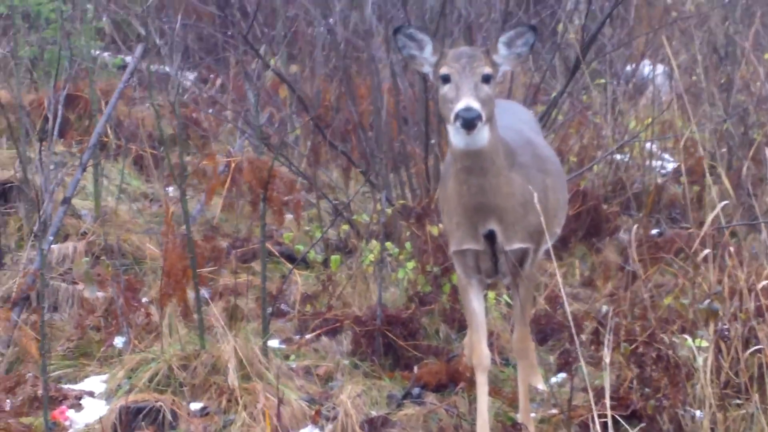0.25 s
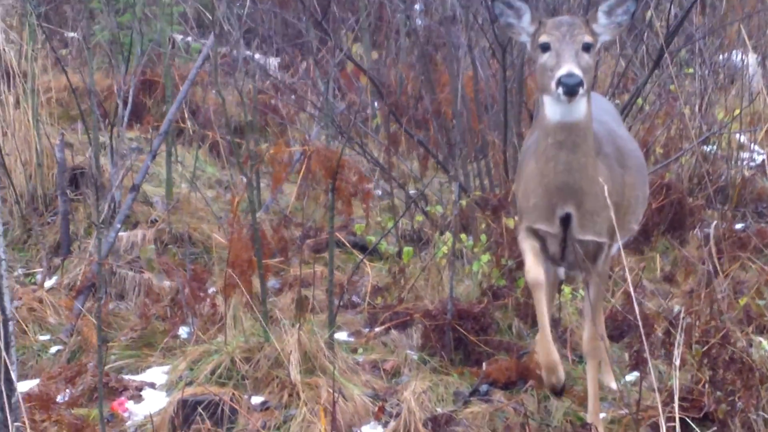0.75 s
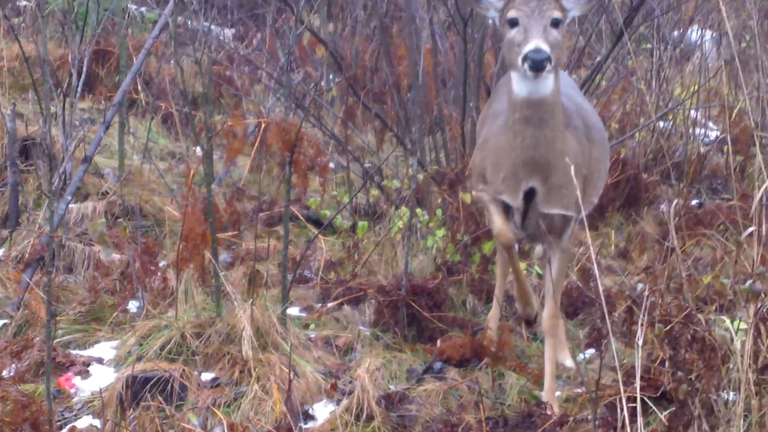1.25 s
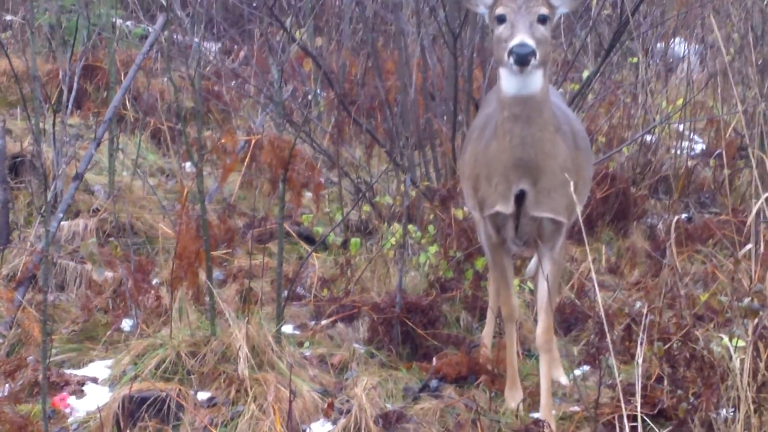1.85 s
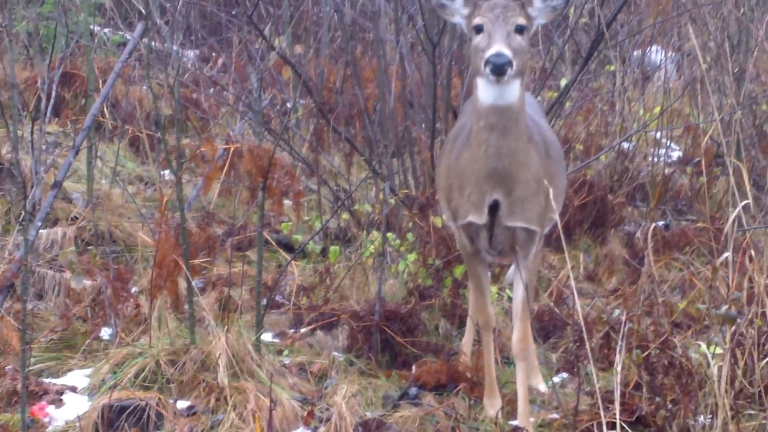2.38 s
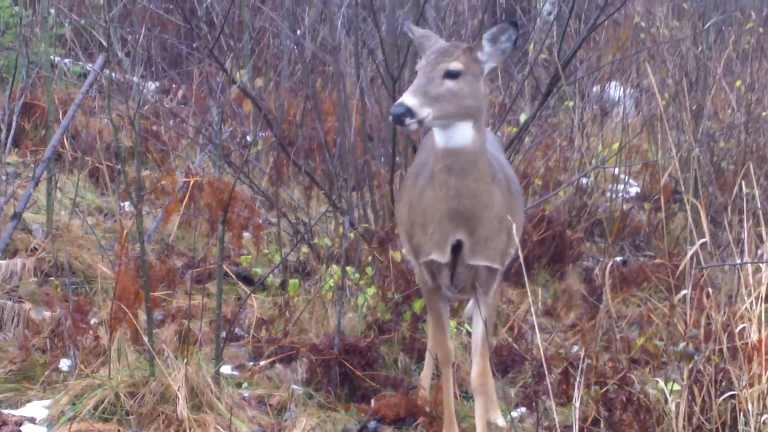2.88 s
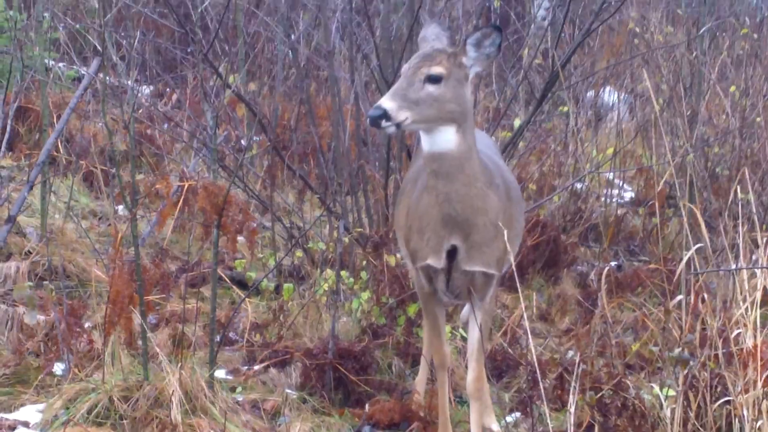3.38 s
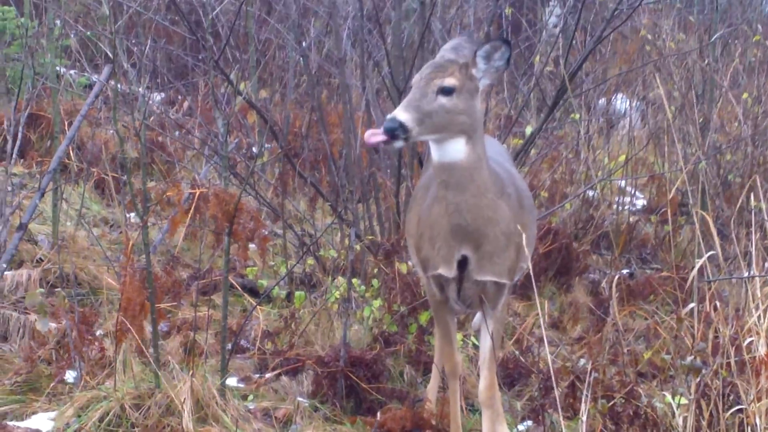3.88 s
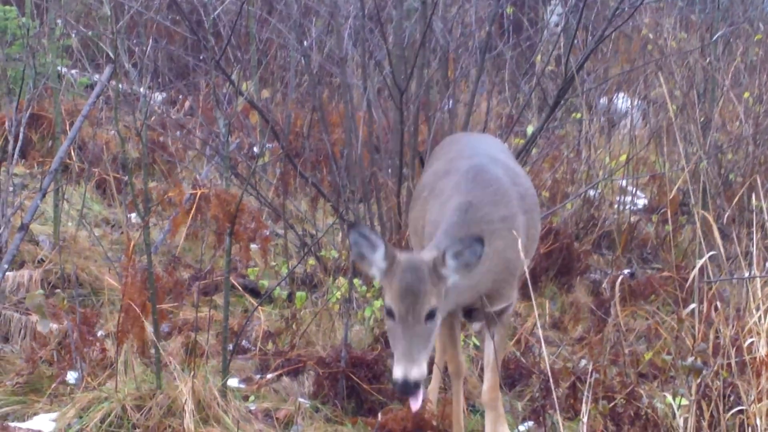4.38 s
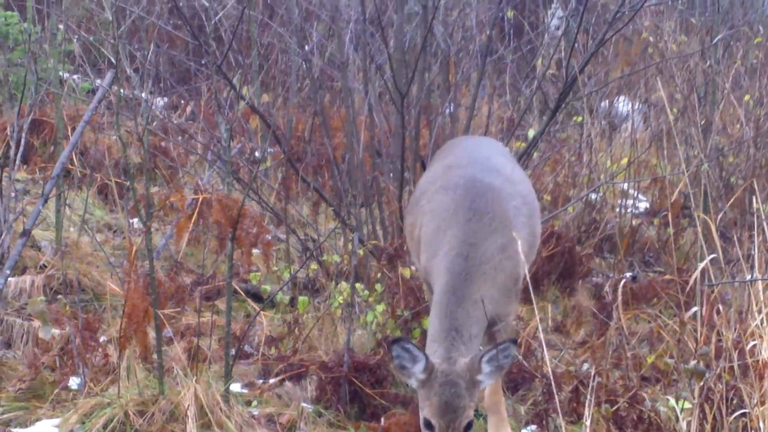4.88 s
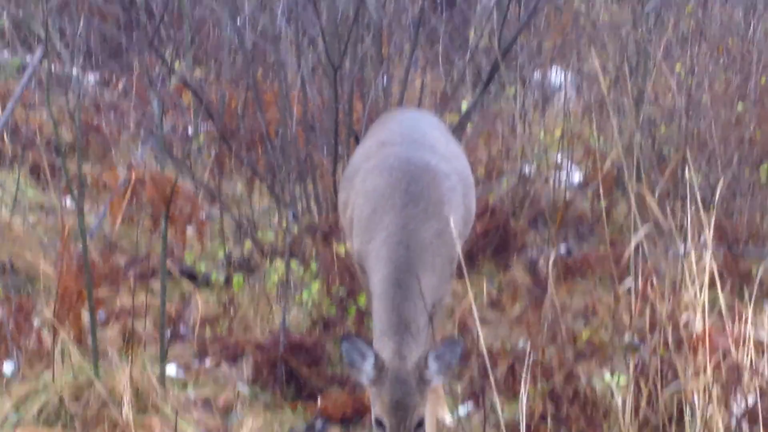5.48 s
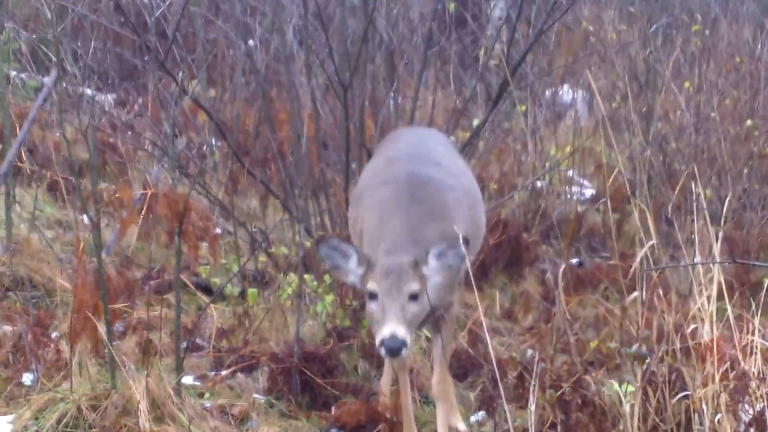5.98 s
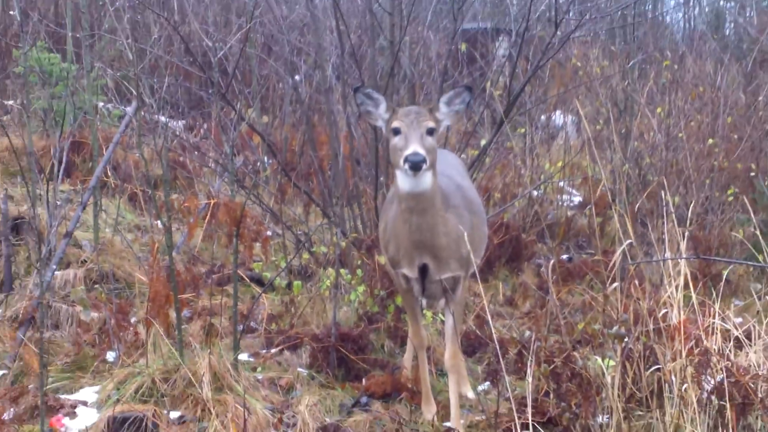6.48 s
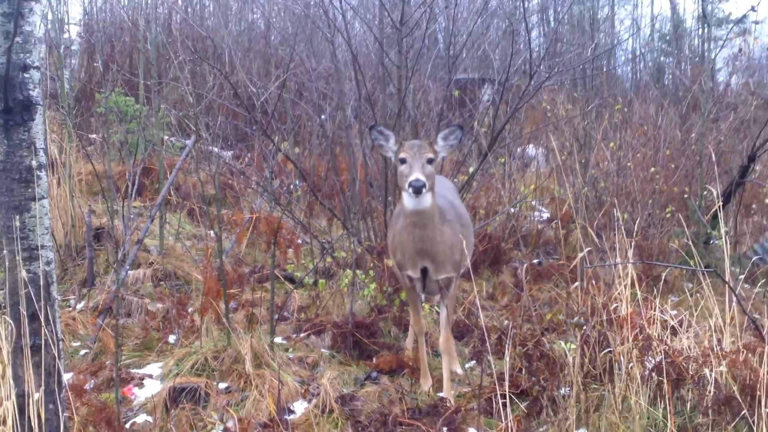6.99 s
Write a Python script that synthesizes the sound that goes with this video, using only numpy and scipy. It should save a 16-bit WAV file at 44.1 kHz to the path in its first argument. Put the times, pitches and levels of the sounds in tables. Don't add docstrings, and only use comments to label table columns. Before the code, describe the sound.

A close, rough wind recording: low puffs and blunt knocks on a small camera microphone, strongest around the third second. Grainy dry grass flickers in the gusts, stems scrape briefly close by, and bare brush gives a smooth distant wash. Crisp little handling clicks follow, then one violent wind slam briefly ducks the sound. It ends calmer, with rumble, faint hiss and a very thin motor whine; no animal sound.

```python
import sys
import numpy as np
from scipy import signal
from scipy.fft import rfft, irfft, next_fast_len
from scipy.io import wavfile
from scipy.ndimage import uniform_filter1d

SR = 44100
rng = np.random.default_rng(int(sys.argv[2]) if len(sys.argv) > 2 else 0)


def linear_from_db(decibels):
    return 10 ** (np.asarray(decibels, float) / 20)


def digitize_waveform(pressure):
    field = np.atleast_2d(pressure).T
    bounded = np.clip(field, -1, 1)
    quanta = np.round(bounded * 32767).astype(np.int16)
    wavfile.write(sys.argv[1], SR, quanta)


N = 319725
TIME_S = np.arange(N) / SR


def rms_one(x):
    return x / np.sqrt(np.mean(x ** 2) + 1e-20)


def in_time(rows):
    s, *columns = np.transpose(rows)
    return [np.interp(TIME_S, s, c) for c in columns]


def drift(rate_hz):
    r = np.exp(-80 * np.pi * rate_hz / SR)
    coarse = rng.standard_normal(N // 40 + 2002)
    slow = signal.lfilter([1], [1, -2 * r, r * r], coarse)[2000:]
    return np.interp(np.arange(N) / 40, np.arange(len(slow)), rms_one(slow))


def gains(spectrum, size):
    hz, level_db = np.transpose(spectrum)
    pitch = np.log(np.arange(size // 2 + 1) * SR / size + 1)
    return linear_from_db(np.interp(pitch, np.log(hz), level_db)), pitch


def colour(x, spectrum):
    size = next_fast_len(N, True)
    gain, _ = gains(spectrum, size)
    return rms_one(irfft(rfft(x, size) * gain, size)[:N])


def patchy(spectrum, shared_db, own_db, rate_hz, count):
    size = next_fast_len(N, True)
    gain, pitch = gains(spectrum, size)
    noise = rfft(rng.standard_normal(size)) * gain
    hz = np.transpose(spectrum)[0]
    centres = np.linspace(np.log(hz[1]), np.log(hz[-3]), count)
    out = np.zeros(N)
    for row in np.eye(count):
        band = irfft(noise * np.interp(pitch, centres, row), size)[:N]
        out += band * linear_from_db(shared_db + own_db * drift(rate_hz))
    return rms_one(out)


def evened(x, seconds):
    span = int(seconds * SR)
    level = np.sqrt(uniform_filter1d(uniform_filter1d(x ** 2, span), span) + 0.095)
    return rms_one(x / level ** 0.62)


def split(x, hz):
    low = signal.sosfiltfilt(signal.butter(3, hz, fs=SR, output="sos"), x)
    return rms_one(low), rms_one(x - low)


def ring(clicks, hz, t60_s):
    r, w = linear_from_db(-60 / (t60_s * SR)), 2 * np.pi * hz / SR
    return signal.lfilter([0, np.sin(w)], [1, -2 * r * np.cos(w), r * r], clicks + 1e-18)


# (time [s], peak rumble [dB], half length [s], thud re rumble [dB])
PUFFS = [(0.041, -27, 0.067, -20), (.28, -16, .035, -12), (.41, -16, 0.063, -9), (0.816, -21.5, 0.082, -19),
         (0.977, -15, 0.031, -5), (1.213, -25.5, 0.086, -14.5), (1.438, -19, 0.057, -8.5),
         (1.65, -19, .055, -1.5), (1.77, -24, 0.048, -17), (1.894, -21, 0.042, -8),
         (2.106, -27, 0.064, -10), (2.68, -25, .055, -24), (2.92, -22, 0.037, -2.5),
         (3.07, -23.5, 0.11, -12), (3.227, -15.5, .03, -14), (3.428, -22.5, .04, -25),
         (3.577, -18.5, 0.078, -11.5), (3.89, -20, 0.11, -3), (4.14, -24, 0.037, -18),
         (4.247, -24.5, .035, 0), (4.423, -22.5, 0.049, -11.5), (4.655, -27, 0.078, -4),
         (4.923, -22, 0.059, -9.5), (5.134, -27, 0.075, -18), (5.825, -23, .035, -24),
         (6.21, -23, .025, -9), (6.36, -25, .07, -25), (6.643, -27.5, 0.095, -32), (6.844, -22, 0.025, -26),
         (7.19, -23, .075, -2)]
# (time [s], rumble [dB], thud re rumble [dB])
STREAM = [(0, -37.5, -10), (.2, -40, -2), (.6, -33.5, -10), (1.35, -35, -8), (1.7, -32.5, -8),
          (2.3, -34, -13), (2.8, -35, -14), (3.3, -31.5, -12), (4.05, -28.5, -10), (4.8, -35, -14),
          (5.3, -33.5, -20), (5.7, -28.5, -17), (5.9, -34.5, -17), (6.04, -37, -10), (6.1, -31, -7),
          (6.5, -32, -20), (7.0, -30.5, -16), (7.25, -26, 0)]


def airflow():
    t = TIME_S[::32]
    stream, edge = linear_from_db(2 * np.array(in_time(STREAM))[:, ::32])
    s, top_db, half_s, sharp_db = np.transpose(PUFFS)[:, :, None]
    puffs = linear_from_db(2 * top_db) * np.exp(-2 * ((t - s) / half_s) ** 2)
    rumble_power = stream + puffs.sum(0)
    thud_power = stream * edge + (puffs * linear_from_db(2 * sharp_db)).sum(0)
    return [np.interp(TIME_S, t, np.sqrt(p)) for p in (rumble_power, thud_power)]


# (frequency [Hz], density [dB per Hz])
RUMBLE = [(8.8, -41), (15, 3), (40, 4), (90, -15), (120, -39), (200, -120)]
# (frequency [Hz], density [dB per Hz])
THUD = [(35, -28), (60, 0), (94, -1.5), (163, -18), (226, -27.5), (260, -32.5), (360, -54.5), (420, -42.5),
        (550, -72), (920, -120)]


def turbulence():
    rumble_amp, thud_amp = airflow()
    lumps = drift(15.4)
    rumble = evened(patchy(RUMBLE, 0.59 * lumps, own_db=0.0, rate_hz=6.7, count=3), seconds=0.064)
    thud = evened(patchy(THUD, 5.3 * lumps, own_db=2.0, rate_hz=28, count=4), seconds=0.083)
    return linear_from_db(-1.43) * rumble_amp * rumble + linear_from_db(-3.0) * thud_amp * thud


def eddy(s, peak_db, width_ms, sign=1):
    out = np.zeros(N)
    near = np.arange(round((s - .08) * SR), min(round((s + .08) * SR), N))
    turn = (near / SR - s) / (width_ms / 1000)
    out[near] = -sign * linear_from_db(peak_db) * turn * np.exp((1 - turn ** 2) / 2)
    return out


# (time [s], peak [dB], width [ms])
EDDIES = [(0.245, -32, 2.8), (0.349, -35, 3.9), (0.41, -24, 3.2), (0.963, -19, 4.1), (0.99, -26, 3),
          (1.405, -26, 4.4), (1.595, -16, 2.8), (1.669, -16, 2.95), (1.897, -26, 3.3), (2.907, -34, 4.8),
          (3.108, -14.5, 4.1), (3.201, -18, 2.9), (3.229, -10.5, 3.9), (3.529, -41, 4.1), (3.577, -17, 2.5),
          (3.919, -13, 2.7), (4.244, -26, 3.2), (4.491, -29, 1.9), (4.67, -18, 2.6), (7.105, -25, 2.6)]
# (time [s], peak [dB], width [ms])
KINKS = [(0.99, -25.5, 1.2), (1.68, -36, 0.97), (1.683, -30.5, 1.3), (3.588, -35, 0.89),
         (3.215, -37.5, 1.34), (5.5226, -26, 0.99), (5.548, -16, 3.2), (6.141, -34, 0.6), (5.526, -38, .35),
         (5.6, -37, 1.6), (5.981, -49, .8), (1.5, -34.5, 1.3), (3.11, -37, 1.3), (4.1, -34, 1.54)]
# (time [s], peak [dB], width [ms])
SLAM = (5.522, -7.6, 3.8)


def buffeting():
    slam_s, slam_db, slam_ms = SLAM
    calm = 1 - np.exp(-((TIME_S - slam_s) / .04) ** 4)
    out = calm * turbulence()
    for s, db, width_ms in EDDIES:
        out += eddy(s + 0.0055, db - 3.5, width_ms, rng.choice([-1, 1]))
    for kink in KINKS:
        out += eddy(*kink)
    core, swing = eddy(*SLAM), eddy(slam_s, slam_db - 9, 2.0 * slam_ms)
    return out + core + swing


# (frequency [Hz], density [dB per Hz])
GRASS = [(1350, -20.5), (2300, -0.5), (2550, -2), (3930, -6), (6120, -7), (6480, -9), (7200, -30),
         (9360, -50), (15800, -120)]
# (frequency [Hz], density [dB per Hz])
SEEDS = [(4290, -51), (7300, -10), (7950, 0.5), (8420, 3), (9880, -11), (11500, -20), (15000, -34),
         (22000, -120)]
# (time [s], strength [dB], brightness [dB])
NEAR_WIND = [(0, -60, 8.5), (.34, -52.5, -1), (.58, -56, 2.5), (.83, -57.5, 1.5), (1.33, -55.5, -2.5),
             (1.95, -59, -4), (2.3, -60.5, -3.5), (3.63, -57.5, -7.5), (3.95, -51, -10), (4.24, -50, -15),
             (4.68, -54.5, -7), (4.78, -60, -2), (5.07, -58.5, -10), (5.45, -65.5, -0.5), (5.75, -66, -7),
             (6.1, -72.5, 3), (6.78, -73, 3.5), (7.25, -70.5, 1)]


def near_grass(sway):
    stems_db, bright_db = in_time(NEAR_WIND)
    blades_db = stems_db + bright_db
    seeds_db = -74 + 0.97 * (blades_db - blades_db.mean())
    grass = patchy(GRASS, 1.12 * sway + 0.61 * drift(23), own_db=0.4, rate_hz=12.0, count=5)
    hits = rng.random(N) < 900 / SR
    grains = hits * linear_from_db(np.minimum(rng.exponential(1, N), 5)) * rng.choice([-1, 1], N)
    stems, blades = split(grass + 0.18 * colour(grains, GRASS), hz=4250)
    seeds = patchy(SEEDS, 1.2 * drift(9), own_db=1.2, rate_hz=8, count=3)
    return linear_from_db(stems_db) * stems + linear_from_db(blades_db) * blades + linear_from_db(seeds_db) * seeds


# (time [s], peak [dB], brightness [dB per octave])
TICKS = [(3.0128, -31, -13), (3.093, -27, -13), (3.5957, -22.5, -8), (4.4649, -13, -2), (4.797, -21, -3),
         (4.8436, -20.5, -4), (5.043, -19.5, -1), (5.3896, -45, 12), (5.435, -39, 13), (5.8107, -39, -7),
         (5.981, -23, 1), (6.1406, -22.5, -4)]
# (frequency [Hz], level [dB], t60 [s])
SHELL = [(3520, 2.5, 0.017), (4020, 6, 0.0088), (4580, 3, 0.0071), (5160, -2, 0.013), (5770, 2, 0.02),
         (6320, 1, 0.022), (8600, -12, 0.017)]
# (time [s], peak [dB], frequency [Hz], t60 [s])
KNOCK = (5, -33, 1300, .006)
GRIP_S, GRIP_HZ, GRIP_WIDTH_HZ, GRIP_DB = 5.9, 4550, 700, -14


def ticks():
    s, peak_db, bright_db = np.transpose(TICKS)
    at = np.round(s * SR).astype(int) + 34
    chance_db = rng.standard_normal((len(at), len(SHELL)))
    out = np.zeros(N)
    for k, (hz, level_db, t60_s) in enumerate(SHELL):
        tilt_db = bright_db * np.log2(hz / 4500)
        grip_db = GRIP_DB * (s > GRIP_S) * (abs(hz - GRIP_HZ) < GRIP_WIDTH_HZ)
        clicks = np.zeros(N)
        clicks[at] = linear_from_db(peak_db + level_db - 12.5 + tilt_db + chance_db[:, k] + grip_db)
        clicks[at + round(.0019 * SR)] = 0.16 * clicks[at]
        out += ring(clicks, hz, min(0.73 * t60_s, .0062))
    out = signal.sosfilt(signal.butter(6, [3100, 9200], "band", fs=SR, output="sos"), out)
    knock_s, knock_db, knock_hz, knock_t60_s = KNOCK
    bump = (np.arange(N) == round(knock_s * SR)) * linear_from_db(knock_db)
    return out + ring(bump, knock_hz, knock_t60_s)


# (time [s], length [s], level [dB], centre [Hz], half width [octaves])
SWISHES = [(.93, .2, -64, 9500, .4), (1.597, 0.063, -51, 8700, 0.14), (1.607, 0.046, -51, 6170, 0.17),
           (1.608, 0.036, -54, 11300, 0.35), (3.02, 0.044, -49, 5000, .45),
           (3.092, 0.027, -50.5, 5000, .45), (4.001, 0.62, -56, 5040, 0.18), (1.2, 0.5, -51.5, 1850, .16),
           (5.28, 0.22, -64, 6200, .22), (5.28, 0.22, -67, 8650, .18), (5.986, .04, -62, 5000, 0.45),
           (7.07, .09, -69, 5940, .2)]


def swishes():
    out = np.zeros(N)
    uneven = linear_from_db(2.5 * drift(250))
    for s, length_s, level_db, hz, octaves in SWISHES:
        edges_hz = [hz * 2 ** -octaves, min(hz * 2 ** octaves, .45 * SR)]
        band = signal.butter(2, edges_hz, "band", fs=SR, output="sos")
        scrape = rms_one(signal.sosfilt(band, rng.standard_normal(SR)))
        start = round(s * SR)
        at = start + np.arange(min(round(length_s * SR), SR, N - start))
        swell = np.sin(np.pi * (at - start) / len(at))
        out[at] += linear_from_db(level_db) * swell * uneven[at] * scrape[:len(at)]
    return out


# (frequency [Hz], density [dB per Hz])
TREES = [(180, -17), (300, -5.5), (376, -7.5), (435, -7.5), (649, -2.5), (777, -0.5), (914, -1),
         (1200, -11), (1560, -19), (2640, -120)]
# (frequency [Hz], density [dB per Hz])
BRUSH = [(560, -24.5), (950, -2), (1110, -0.5), (1670, 0.5), (3000, -13.5), (3900, -20.5), (6600, -120)]
# (time [s], level [dB])
CROWNS = [(0, -54), (.4, -54), (.8, -57), (1.2, -55.5), (2.2, -57), (3.2, -59.5), (3.8, -59.5),
          (4.5, -56.5), (5.4, -57), (5.9, -61), (6.15, -53.5), (6.75, -54), (7.25, -57)]
# (time [s], strength [dB], brightness [dB])
FAR_WIND = [(0, -54, 5.5), (.34, -52.5, 5.5), (.75, -54.5, 1), (1.05, -54.5, 2), (1.35, -55.5, 5.5),
            (1.75, -56, 2.5), (2.3, -57, -1), (3.0, -60, 4.5), (3.6, -58, -1), (4.1, -55.5, 2),
            (4.7, -56.5, 1.5), (5.35, -54, -3.5), (5.71, -51.5, -6.5), (5.98, -53.5, -6.5),
            (6.15, -51.5, -3), (6.35, -52.5, -5), (6.6, -54.5, -6.5), (7.25, -56.5, -2)]


def far_trees(sway):
    crowns_db, = in_time(CROWNS)
    branches_db, bright_db = in_time(FAR_WIND)
    twigs_db = branches_db + bright_db
    crowns = patchy(TREES, 0.42 * sway, own_db=1.1, rate_hz=1.2, count=5)
    brush = patchy(BRUSH, 0.35 * sway, own_db=0.56, rate_hz=5.5, count=5)
    branches, twigs = split(brush, hz=1640)
    return linear_from_db(crowns_db) * crowns + linear_from_db(branches_db) * branches + linear_from_db(twigs_db) * twigs


# (frequency [Hz], level [dB rms])
WHINE = [(8538, -88), (8608, -78.5), (9410, -92)]
# (time [s], level [dB])
WHINE_ON = [(0, 9), (5.38, 2), (5.45, -8), (6.3, -8), (6.4, 6), (7.25, 5)]
# (frequency [Hz], density [dB per Hz])
HISS = [(1500, -30), (2500, -17), (4000, -10), (7000, -1.5), (11000, -1.5), (16500, -4)]
HISS_DB = -64


def camera():
    turns_s = np.cumsum(1 + .0004 * drift(5)) / SR
    whine = np.zeros(N)
    for hz, db in WHINE:
        whine += linear_from_db(db - 1.5 + drift(4)) * np.sin(2 * np.pi * hz * turns_s)
    hiss = colour(rng.standard_normal(N), HISS)
    return linear_from_db(HISS_DB) * hiss + linear_from_db(in_time(WHINE_ON)[0]) * whine


def scene():
    sway = drift(2.0)
    port = signal.butter(2, [7100, 8000], "bandstop", fs=SR, output="sos")
    close = signal.sosfilt(port, ticks() + swishes())
    return (buffeting() + near_grass(sway) + close + far_trees(sway) + camera())[None]


DUCK_FROM_S, DUCK_FALL_S, DUCK_UNTIL_S, DUCK_RISE_S = 5.525, .015, 5.965, .008
DUCK_DB, DUCK_CREEP_DB = -4.8, 1.2


def duck_db():
    s = [DUCK_FROM_S, DUCK_FROM_S + DUCK_FALL_S, DUCK_UNTIL_S, DUCK_UNTIL_S + DUCK_RISE_S]
    return np.interp(TIME_S, s, [0, DUCK_DB, DUCK_DB + DUCK_CREEP_DB, 0])


# (time [s], level [dB])
SWITCHES = [
    (5.5165, -43),
    (5.5245, -42),
]


def switch_crackle():
    out = np.zeros(N)
    for s, level_db in SWITCHES:
        start = round(s * SR)
        burst = signal.lfilter([.35], [1, -.65], rng.standard_normal(90)) * np.hanning(90)
        out[start:start + 90] += linear_from_db(level_db + 4) * burst
    return out


def roll_off(x):
    return signal.sosfilt(signal.butter(12, 16500, fs=SR, output="sos"), x)


CLIP, CUTOFF_HZ = .43, 15830


def record(dry):
    rounded = dry / (1 + (dry / CLIP) ** 8) ** (1 / 8)
    ducked = rounded * linear_from_db(duck_db()) + switch_crackle()
    low_pass = signal.ellip(12, .5, 70, CUTOFF_HZ - 30, fs=SR, output="sos")
    mix = signal.sosfilt(low_pass, ducked)
    mix *= np.sin(np.pi / 2 * np.minimum((N - np.arange(N)) / 400, 1))
    return roll_off(mix)


dry = scene()
out = record(dry)
digitize_waveform(out)
```